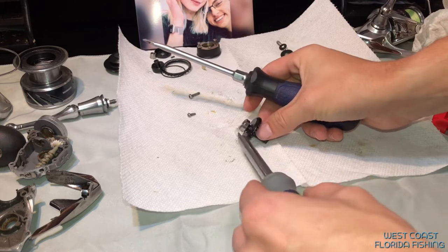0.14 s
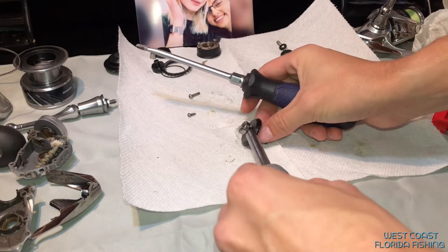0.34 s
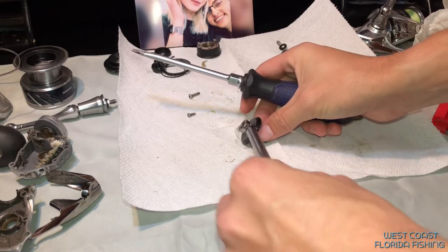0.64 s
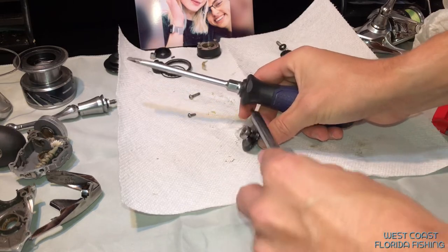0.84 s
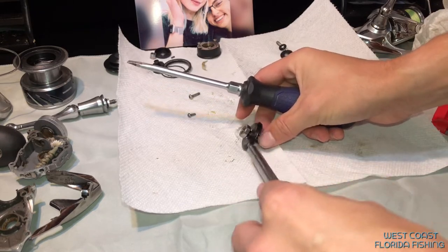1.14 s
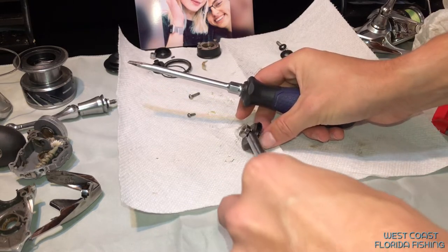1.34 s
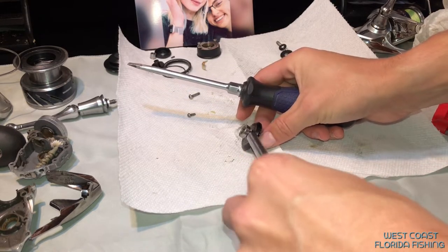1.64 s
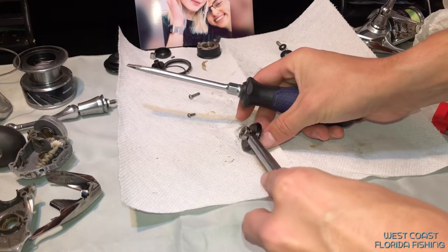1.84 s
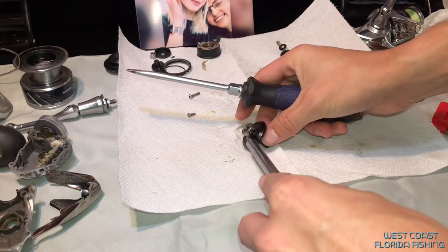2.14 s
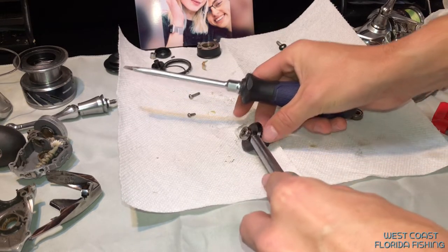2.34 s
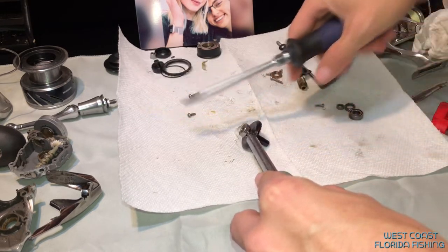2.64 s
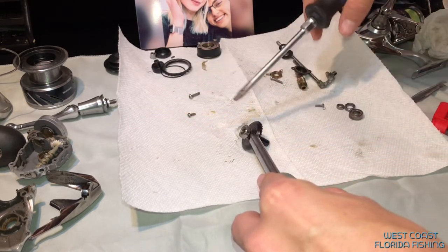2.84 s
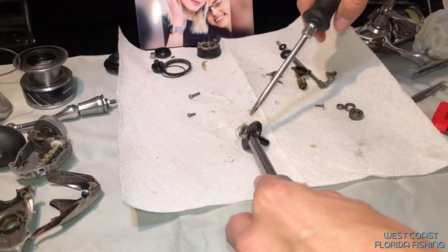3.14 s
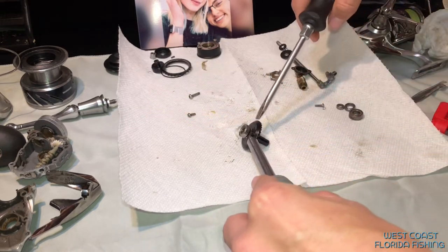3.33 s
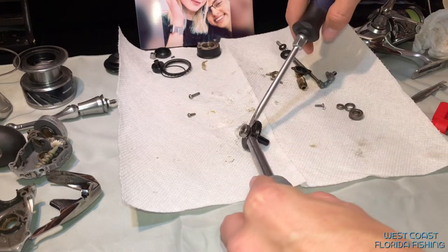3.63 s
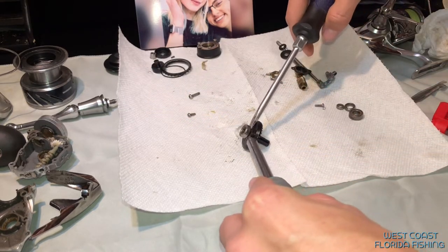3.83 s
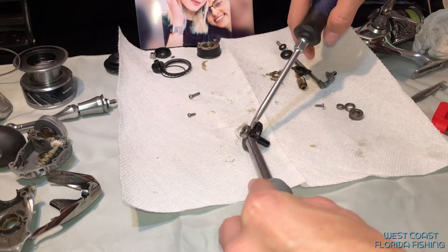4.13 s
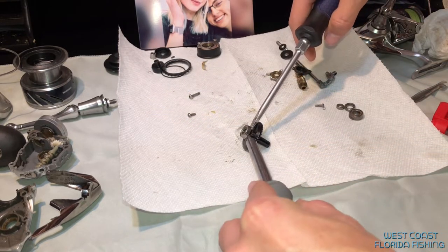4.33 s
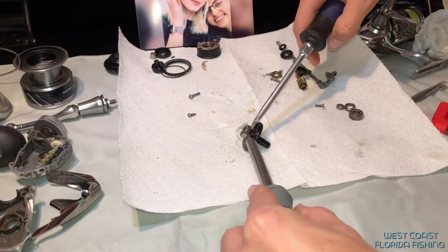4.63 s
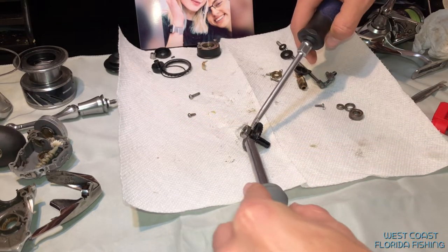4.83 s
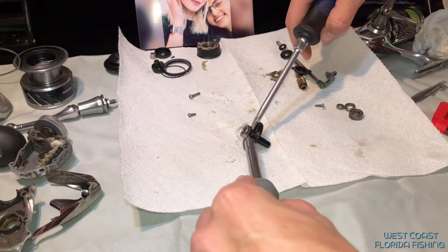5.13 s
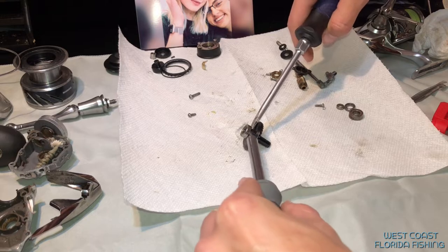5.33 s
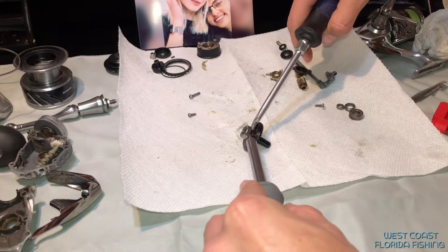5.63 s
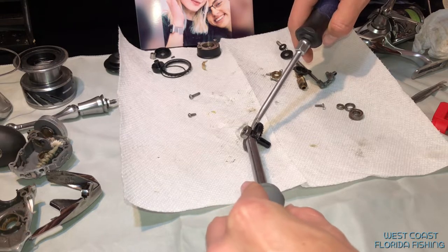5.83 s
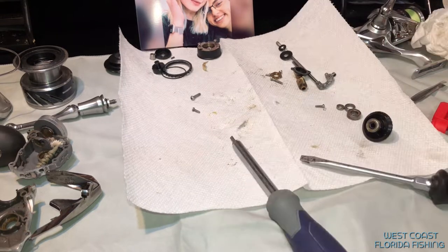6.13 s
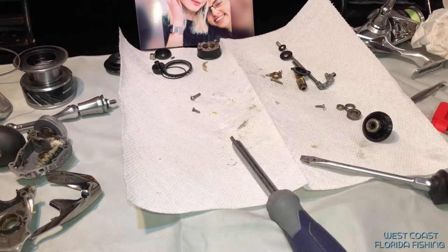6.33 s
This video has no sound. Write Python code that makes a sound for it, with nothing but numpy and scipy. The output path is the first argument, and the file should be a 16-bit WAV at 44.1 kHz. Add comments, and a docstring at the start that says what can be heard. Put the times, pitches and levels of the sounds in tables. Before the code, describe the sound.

Hard metallic pry clicks with dull wooden clacks, then faint steel taps and ticks in a small room over a low machine hum and rumble.

```python
"""Two steel screwdrivers pry at a stuck bearing on a small gear, on a table covered with a paper towel.
Clicks, taps and ticks are choked bursts of noise coloured by the steel; scrapes and shoves are trains of
tiny random slips. Knocks add a dull clack and ringing sines for the table, and a small room answers with echoes
and a noise tail. Underneath, sines make a machine hum and filtered noise makes room air and a deep draught.
Near the end everything fades to a short silence and comes back."""
import sys
import numpy as np
from scipy import signal
from scipy.fft import rfft, irfft, next_fast_len
from scipy.io import wavfile
from scipy.ndimage import uniform_filter1d, map_coordinates

SR = 44100
rng = np.random.default_rng(int(sys.argv[2]) if len(sys.argv) > 2 else 0)


def wav_record(signal):
    """Record a signal, one row per channel, as 16-bit PCM in the file named by sys.argv[1]."""
    frames = np.transpose(np.atleast_2d(signal))
    bounded = np.clip(frames, -1, 1)
    # unit amplitude maps onto the largest positive 16-bit level
    quanta = np.round(bounded * 32767).astype(np.int16)
    wavfile.write(sys.argv[1], SR, quanta)


N = 285310  # length in samples
MEDIUM_DB = -40  # event level of a medium blow, from which the rules of force count


def amp(db):
    """Decibels to gain."""
    return 10 ** (np.asarray(db) / 20)


def unit(x):
    """Scale to rms 1."""
    return x / np.sqrt(np.mean(x ** 2) + 1e-20)


def along(points, hz):
    """Read a curve of (frequency, value) points on a log frequency axis."""
    f, v = np.transpose(points)
    return np.interp(np.log(hz + 1), np.log(f + 1), v)


def seconds(size):
    """A time axis in seconds."""
    return np.arange(size) / SR


def coloured(x, points):
    """Minimum-phase filter with the gain of (Hz, dB) points, so a blow keeps its sharp start."""
    m = 2 * next_fast_len(len(x) // 2 + 4096)
    gain = amp(along(points, np.fft.rfftfreq(m, 1 / SR)))
    # folding the cepstrum onto positive time makes the filter causal
    cepstrum = irfft(np.log(gain))
    cepstrum[1:m // 2] *= 2
    cepstrum[m // 2 + 1:] = 0
    response = np.exp(rfft(cepstrum))
    return irfft(rfft(x, m) * response, m)[:len(x)]


def noise(points):
    """Steady noise of rms 1 with a given spectrum."""
    gain = amp(along(points, np.fft.rfftfreq(N, 1 / SR)))
    return unit(irfft(rfft(rng.standard_normal(N)) * gain, N))


def wobble(rate):
    """A smooth random curve with rate knots a second."""
    knots = rng.standard_normal(int(N * rate / SR) + 4)
    return map_coordinates(knots, [np.arange(N) * rate / SR])


def strength(x):
    """Scale a blow so that its loudest 2 ms have rms 1."""
    power = uniform_filter1d(x ** 2, size=88, mode="constant")
    return x / np.sqrt(power.max())


def add(track, start_s, x):
    """Mix x into the track at start_s."""
    part = track[round(start_s * SR):][:len(x)]
    part += x[:len(part)]


def by_force(events, body_db, body_per_db):
    """The softer the contact, the more body it has: rows (start_s, level_db, body_db)."""
    return [(s, db, body_db + body_per_db * (MEDIUM_DB - db)) for s, db, *_ in events]


# How each part rings, a list of resonances per part: [pitch_hz, width_hz, level_db]
PART_RESONANCES = {"bearing": [(2260, 420, -8), (3890, 430, -4), (4616, 420, 1), (5170, 400, -6.5),
                   (5730, 430, -3), (6530, 440, -2), (7320, 480, -3)], "blade": [(1580, 150, -12.5),
                   (3160, 250, -7), (3530, 340, -8.5), (5320, 240, -0.5), (6900, 300, -0.5)],
                   "corner": [(2300, 300, -10.5), (4660, 520, 3.5), (6530, 700, 0.5), (7420, 390, -1.5)],
                   "gear": [(2435, 180, 0.5), (4130, 330, 0), (4560, 350, -1.5), (5550, 470, 1),
                   (7070, 290, 1)]}
# Bare steel contact, relative spectrum: [pitch_hz, level_db]
CRACK_SPECTRUM = [(400, -31), (1000, -25), (1700, -12.5), (2400, -7), (3200, -6.5), (4600, -1), (6000, 2),
                  (7600, -5.5), (8600, -18.5), (11000, -30), (15500, -37)]


def steel(part, crack_db):
    """Spectrum of a part: its broad resonances stand out of the crack of the contact."""
    hz = np.geomspace(300, 16000, num=300)
    ring_power = 0
    for centre, width, db in PART_RESONANCES[part]:
        detune = (hz ** 2 - centre ** 2) / (centre * width)
        ring_power = ring_power + amp(2 * db) / (1 + detune ** 2) ** 1.36
    crack_power = amp(2 * (along(CRACK_SPECTRUM, hz) + crack_db))
    return np.column_stack([hz, 10 * np.log10(ring_power + crack_power)])


def contacts(events, spectrum, grip_t60, edge_db, level_db, wet_db):
    """Steel on steel: a snap and a burst of chatter that the gripping fingers choke within milliseconds."""
    track, t = np.zeros(N), seconds(SR // 3)
    for start_s, event_db, body_db in events:
        force = rng.standard_normal(len(t)) * amp(-60 * t / grip_t60)
        force[0] = 6  # the snap itself
        # a broad contact has more body, a sharp corner more top
        balance = [(2800, body_db), (3700, 0.95 * body_db), (4500, 0.0032),
                   (7500, 0.4 * edge_db), (9500, edge_db), (13000, edge_db - 3)]
        click = coloured(coloured(force, spectrum), balance)
        add(track, start_s, amp(event_db + level_db) * in_room(strength(click), wet_db))
    return track


# A loaded tip jumps on the bearing and drives the gear into the table, more or less squarely; levels are
# relative within each layer: [start_s, click_level_db, knock_level_db, knock_bass_db]
PRIES = [(0.3205, -21.5, -60, -6), (0.7611, -31.5, -37, 6.5), (0.7838, -13.5, -28, 2),
         (0.7934, -20, -25.5, -2), (1.0239, -19.5, -27.5, 3), (1.349, -23.5, -37, -16.5),
         (1.4125, -36, -36.5, -4), (1.5211, -46, -46, 2.5), (1.653, -56.5, -53, 0.5),
         (1.766, -70, -55.5, -1.5), (1.964, -67, -49.5, 2), (2.0211, -30, -37.5, 4),
         (4.9464, -50.5, -43, 1.5), (4.9654, -61, -56, 3), (5.3308, -43, -41.5, -0.5),
         (5.3394, -49, -42, -4), (5.392, -51, -51.5, 0), (5.466, -55, -57, 3.5)]


def pry_clicks():
    """A loaded tip jumps on the bearing, whose resonances colour the click."""
    events = by_force(PRIES, body_db=4.5, body_per_db=0.39)
    return contacts(events, steel("bearing", crack_db=-1), grip_t60=0.025, edge_db=-3.5,
                    level_db=-7.5, wet_db=-9.5)


FUMBLE_S, FUMBLES_PER_S = (2.6, 5.9), 1.6  # start and end of the fumbling; ticks per second
FUMBLE_DB, FUMBLE_SPREAD_DB = -59, 1  # middle event level, and reach to either side


def fumbles():
    """Faint ticks at chance moments as the tips feel for a hold: rows (start_s, level_db, body_db)."""
    start, end = FUMBLE_S
    draws = rng.random((round(FUMBLES_PER_S * (end - start)), 2))
    return [(start + when * (end - start), FUMBLE_DB + FUMBLE_SPREAD_DB * (2 * size - 1), 0)
            for when, size in draws]


# The corner of a tip glances off the bearing, levels relative: [start_s, level_db, body_db]
TICKS = [(0.1117, -48, 0), (0.403, -42.5, -6), (0.622, -47, -4), (0.767, -33, -8), (2.1252, -29, 8.5),
         (2.224, -46.5, -6), (2.4641, -41, 0), (2.4785, -41, -3), (2.5696, -52, -5.5), (4.063, -54, 6),
         (4.1746, -45, -2), (4.5141, -20, -1), (5.0555, -52, 5)]


def corner_ticks():
    """A sharp corner touches the bearing, with much more top than the other contacts."""
    return contacts(TICKS + fumbles(), steel("corner", crack_db=-4), grip_t60=0.02, edge_db=11,
                    level_db=-7.5, wet_db=-9.5)


# The flat blade seating itself against the bearing, levels relative: [start_s, level_db]
TAPS = [(3.5044, -33), (3.5481, -32.5), (3.5972, -44.5), (3.7233, -53), (3.9242, -34.5)]


def blade_taps():
    """The flat blade taps the bearing and sounds with its own resonances."""
    events = by_force(TAPS, body_db=0, body_per_db=0.57)
    return contacts(events, steel("blade", crack_db=-9.5), grip_t60=0.021, edge_db=-6.5,
                    level_db=-6.5, wet_db=-9.0)


# The loose gear rocking on a tip, levels relative: [start_s, level_db]
ROCKS = [(2.2834, -44), (2.8266, -51.5), (2.8835, -49), (3.052, -55.5), (3.1564, -33.5), (3.2864, -50.5),
         (3.3911, -40), (3.44, -48)]


def gear_rocks():
    """The loose gear rocks on a tip and sounds with its own resonances."""
    events = by_force(ROCKS, body_db=3.5, body_per_db=0.65)
    return contacts(events, steel("gear", crack_db=-11), grip_t60=0.022, edge_db=-2.5,
                    level_db=-10.0, wet_db=-8.5)


KNOCK_LAG_S, GLANCE_LOSS_DB = .0017, 27  # the table answers just after the tip; a tick hardly reaches it
THUD_PER_DB, HOLLOW_PER_DB = .2, .33  # dB of thud and hollow gained for each dB that a knock is softer
# Ringing modes of the table, levels relative, decays capped at 0.3 s in use: [pitch_hz, level_db, t60_s]
TABLE_MODES = [(309.5, 3, 0.22), (391.7, 6, 0.25), (446.2, -20.5, 0.49), (720, -9.5, 0.48), (938, -6, 0.14),
               (1071, -25, 0.25), (1325, -18, 0.067), (1750, -8.5, 0.15), (1720, 0.5, 0.059),
               (1850, -26.5, 0.072), (2235, -12, 0.14), (2380, -17.5, 0.06)]
# Dull clack of the board, relative spectrum: [pitch_hz, level_db]
BOARD_SPECTRUM = [(90, -13), (130, -3.5), (200, -8.5), (310, 4.5), (400, -1), (490, -11.5), (750, -9),
                  (1000, -19), (1250, -4.5), (1550, -19), (2100, -18.5), (2900, -33.5), (4000, -28.5),
                  (7000, -83.5)]


def table_knocks(ring_db, dull_t60, thud_db, hollow_db, level_db, wet_db):
    """The gear is driven into the table: a dull clack and the ring of the board."""
    track, t = np.zeros(N), seconds(SR // 2)
    blows = [(s, db, bass) for s, _, db, bass in PRIES]
    blows += [(s, db - GLANCE_LOSS_DB, 0) for s, db, _ in TICKS]
    for start_s, knock_db, bass_db in blows:
        ring = 0
        for hz, mode_db, t60 in TABLE_MODES:
            # each mode is struck a little differently every time
            decay = amp(mode_db + rng.normal(0, 2) - 60 * t / min(t60, .3))
            ring = ring + decay * np.sin(2 * np.pi * (hz * t + rng.random()))
        ring *= 1 - np.exp(-t / .0013)  # soft onset
        force = rng.standard_normal(len(t)) * amp(-60 * t / dull_t60)
        force[0] = 14  # the blow itself
        clack = in_room(strength(coloured(force, BOARD_SPECTRUM)), wet_db)
        # the softer the blow, the more of it is low thud and hollow middle
        softness_db = MEDIUM_DB - knock_db
        thud = thud_db + THUD_PER_DB * softness_db + bass_db
        hollow = hollow_db + HOLLOW_PER_DB * softness_db + bass_db
        balance = [(420, thud), (580, hollow), (900, hollow), (1150, 0)]
        blow = coloured(clack + amp(ring_db) * strength(ring), balance)
        add(track, start_s + KNOCK_LAG_S, amp(knock_db + level_db) * blow)
    return track


def stroke(spectrum, middle_s, half_s, level_db, tilt_db, slips_per_s, scatter_db, wet_db):
    """Tiny irregular slips, swelling and fading with the pressure of one stroke."""
    track, t = np.zeros(N), seconds(SR // 2) - .22  # time zero is the middle of the stroke
    slips = (rng.random(len(t)) < slips_per_s / SR) * amp(scatter_db * rng.standard_normal(len(t)))
    slips = slips * rng.choice([-1, 1], len(t))
    tilt = [(250, 0), (8000, tilt_db * np.log2(8000 / 250))]  # tilt_db is per octave
    rub = unit(coloured(coloured(slips, spectrum), tilt))
    pressure = np.exp(-(t / half_s) ** 2 / 2)
    add(track, middle_s + t[0], amp(level_db) * in_room(rub * pressure, wet_db))
    return track


# the gear skids on the towel after a pry: lag, half length, level after a medium knock,
# dB per dB of knock, tilt in dB per octave
SKID_LAG_S, SKID_HALF_S, SKID_DB, SKID_PER_DB, SKID_TILT_DB = .011, .008, -46, 0.67, -3
# and the tip drags on over the bearing: lag, half length, dB under the knock, tilt in dB per octave
DRAG_LAG_S, DRAG_HALF_S, DRAG_UNDER_DB, DRAG_TILT_DB = .028, .01, 18, -5


def skids_after_pries():
    """Each pry ends in a skid of the gear that grows with the knock and its bass: a list of strokes."""
    return [(s + SKID_LAG_S, SKID_HALF_S, SKID_DB + SKID_PER_DB * (db - MEDIUM_DB) + bass, SKID_TILT_DB)
            for s, _, db, bass in PRIES]


def drags_after_pries():
    """Each pry ends in a drag of the tip that grows with the knock: a list of strokes."""
    return [(s + DRAG_LAG_S, DRAG_HALF_S, db - DRAG_UNDER_DB, DRAG_TILT_DB) for s, _, db, _ in PRIES]


# Steel dragging over each part, a list of strokes per part, levels relative:
# [middle_s, half_length_s, level_db, tilt_db_per_octave]
SCRAPES = {"bearing": [(0.393, 0.0066, -54.5, -7.5), (.757, .004, -49, -6), (.805, 0.012, -29.5, -9.5),
           (0.839, .007, -38, -9.5), (2.014, 0.0055, -57, -3), (2.24, 0.014, -57, 3.5)],
           "gear": [(2.275, 0.0089, -55.5, -3.5), (2.354, 0.018, -64, 3)],
           "blade": [(3.584, 0.022, -53, -2.7), (3.79, 0.019, -58.5, -2)]}
# Tone of sliding, duller than a blow: [pitch_hz, level_db]
GRIT_SPECTRUM = [(700, -9), (1300, 3), (7700, -0.5), (10000, -9), (15000, -20)]


def steel_scrapes():
    """Steel drags over steel: dense slips ring the part, dulled by the sliding."""
    drags = [(steel("bearing", crack_db=-1), SCRAPES["bearing"] + drags_after_pries()),
             (steel("gear", crack_db=-11), SCRAPES["gear"]),
             (steel("blade", crack_db=-9.5), SCRAPES["blade"])]
    track = np.zeros(N)
    for part, rows in drags:
        for row in rows:
            track += stroke(part, *row, slips_per_s=540, scatter_db=2.5, wet_db=-7.5)
    return coloured(track, GRIT_SPECTRUM)


# The gear shoved over the towel, levels relative: [middle_s, half_length_s, level_db, tilt_db_per_octave]
SHOVES = [(0.451, 0.043, -57, -3), (.73, 0.032, -49, 0.5), (0.805, 0.029, -38, 1.5),
          (1.445, 0.038, -44, -4), (1.538, 0.0072, -39.5, -7), (2.009, 0.033, -51, -0.5),
          (4.617, 0.023, -48.5, -2.5), (4.923, 0.047, -46.5, -1), (5.347, 0.056, -55.5, 0),
          (5.75, 0.087, -60.5, -0.5)]
# Soft rub on the towel, relative spectrum: [pitch_hz, level_db]
TOWEL_SPECTRUM = [(120, -17.5), (200, -10), (260, -8), (320, 5.5), (400, 3), (500, -11.5), (700, -10),
                  (950, -16.5), (1250, -14), (1800, -25.5), (4000, -45.5)]


def towel_shoves():
    """The gear slides over the paper towel: low, soft slips, both in shoves and in skids after pries."""
    return sum(stroke(TOWEL_SPECTRUM, *row, slips_per_s=450, scatter_db=0.5, wet_db=-7)
               for row in SHOVES + skids_after_pries())


# Decay of the room tail: [pitch_hz, t60_s]
ROOM_DECAY = [(150, 0.31), (400, .28), (1500, 0.22), (6000, 0.22), (9000, 0.27), (15000, 0.1)]


def in_room(x, wet_db):
    """The sound, quick echoes off the things on the table, and the diffuse tail of the walls."""
    hz, t, z = signal.stft(rng.standard_normal(SR // 2), SR, nperseg=256)
    decay = amp(-60 * t / along(ROOM_DECAY, hz)[:, None])
    tail = signal.istft(z * decay, SR, nperseg=256)[1]
    tail *= 1 - np.exp(-seconds(len(tail)) / 0.0013)
    tail /= np.linalg.norm(tail)
    for delay_s in rng.uniform(0.0017, .022, size=8):
        add(tail, delay_s, [0.23 * rng.choice([-1, 1])])
    return x + amp(wet_db) * signal.fftconvolve(x, tail)[:len(x)]


# Room air, relative spectrum: [pitch_hz, level_db]
AIR_SPECTRUM = [(20, -12), (36, 3), (55, -2.5), (80, -12), (110, -10), (180, -23), (250, -18.5), (300, -29),
                (500, -34.5), (1000, -41.5), (2500, -47.5), (7000, -50), (10000, -54.5), (15500, -56)]
# Slow pressure swell of the draught, relative spectrum: [pitch_hz, level_db]
DRAUGHT_SPECTRUM = [(1, -17.5), (5, 3), (10, 5), (16, -25.5), (28, -29), (60, -61), (150, -120)]
# Level of the draught over time: [time_s, level_db]
DRAUGHT_LEVEL = [(0, -24.5), (5, -26.5), (6.4, -32.5)]
# Partials of the machine hum, levels relative: [pitch_hz, level_db]
HUM_PARTIALS = [(36, -49), (52, -56.5), (100, -56), (150, -63.5), (243, -71), (258, -64), (323, -77)]


def background(air_db, hum_db, waver):
    """Room air and a deep draught of noise, and a machine hum of sines unsteady in level and phase."""
    t = seconds(N)
    hum = 0
    for hz, db in HUM_PARTIALS:
        level = amp(db + 2.2 * wobble(4.4))
        hum = hum + level * np.sin(2 * np.pi * hz * t + waver * wobble(6))
    draught = amp(np.interp(t, *np.transpose(DRAUGHT_LEVEL))) * noise(DRAUGHT_SPECTRUM)
    return amp(air_db) * noise(AIR_SPECTRUM) + draught + amp(hum_db) * hum


def scene():
    """All the work at the table over the room's background."""
    steel_hits = pry_clicks() + corner_ticks() + blade_taps() + gear_rocks()
    table = table_knocks(ring_db=-7.0, dull_t60=0.055, thud_db=-0.5, hollow_db=-1.5,
                         level_db=1.0, wet_db=-6.5)
    sliding = amp(-3.5) * steel_scrapes() + amp(-3.5) * towel_shoves()
    room = background(air_db=-47.0, hum_db=0.5, waver=.4)
    return (steel_hits + table + sliding + room)[None]


FADE_S, FADE_HALF_S, FADE_POWER = 6.043, 0.15, 1.57  # middle, reach to either side, bend of the fade
SILENT_HALF_S = 0.013  # reach of the silent core to either side
TOP_HZ = 15830  # nothing sounds above this


def record(dry):
    """A brief fade to silence and back, then a steep band limit."""
    away_s = np.abs(seconds(N) - FADE_S)
    fade = np.minimum(away_s / FADE_HALF_S, 1) ** FADE_POWER
    faded = dry * fade * (away_s > SILENT_HALF_S)
    m = next_fast_len(N + SR)
    passed = np.fft.rfftfreq(m, 1 / SR) < TOP_HZ
    return irfft(rfft(faded, m) * passed, m)[:, :N]


dry = scene()
out = record(dry)
wav_record(out)
```